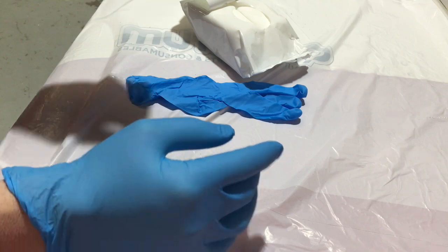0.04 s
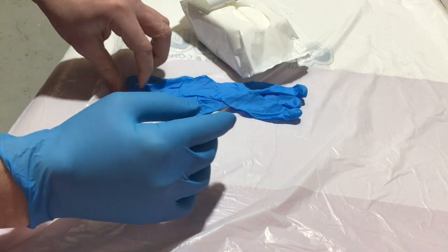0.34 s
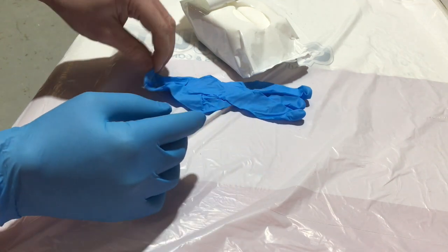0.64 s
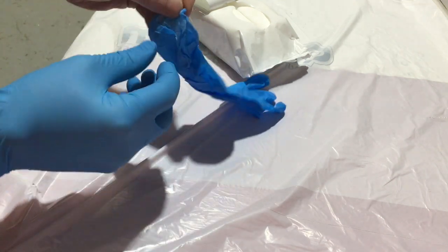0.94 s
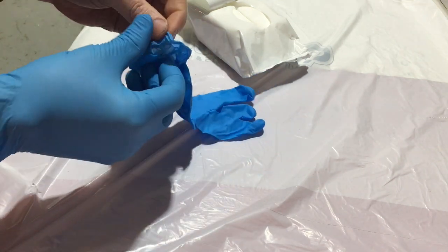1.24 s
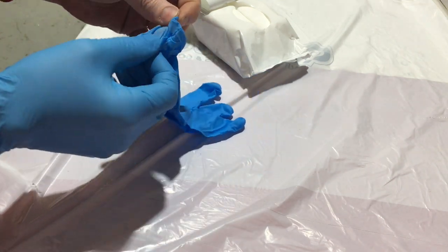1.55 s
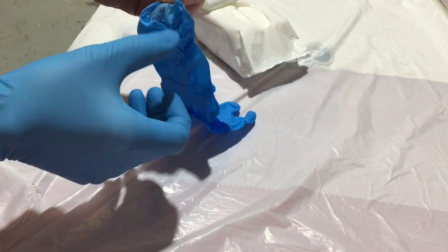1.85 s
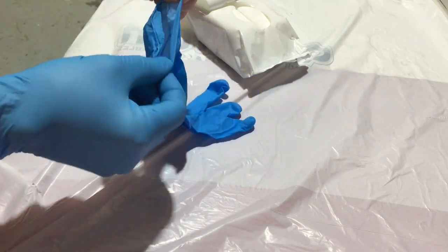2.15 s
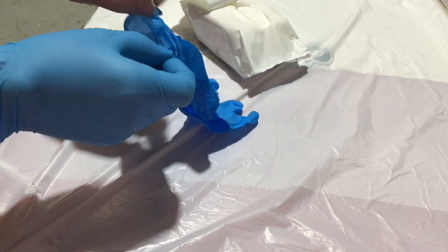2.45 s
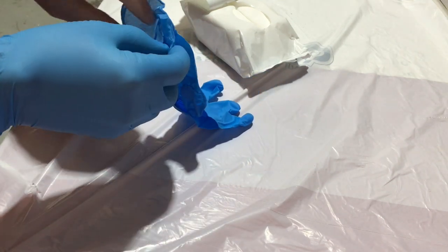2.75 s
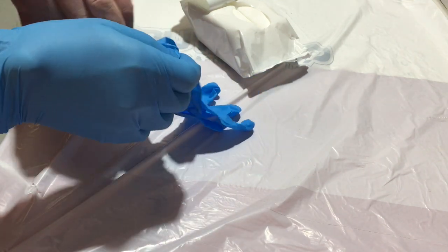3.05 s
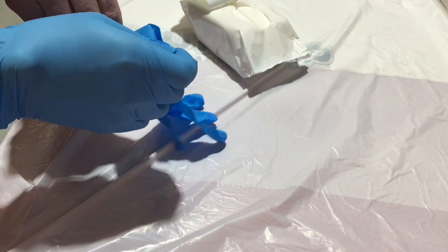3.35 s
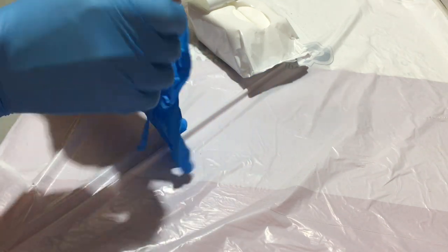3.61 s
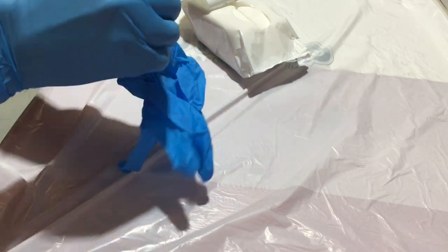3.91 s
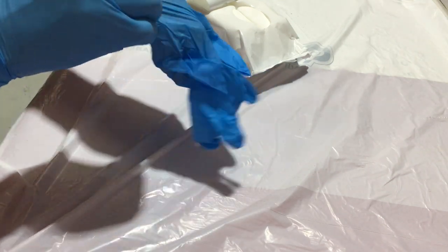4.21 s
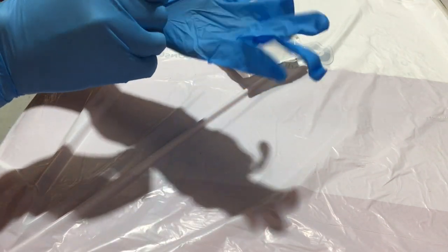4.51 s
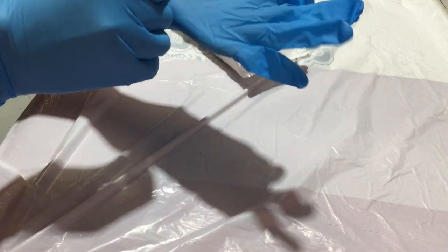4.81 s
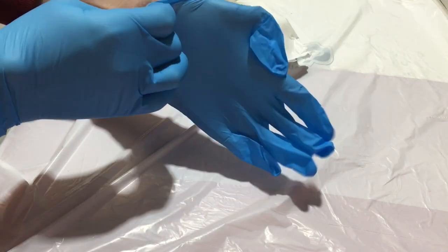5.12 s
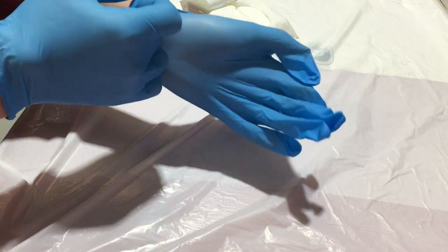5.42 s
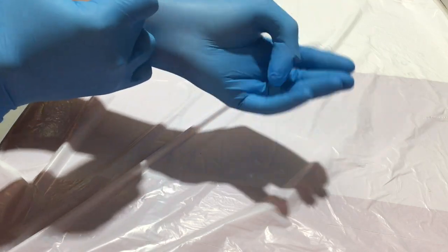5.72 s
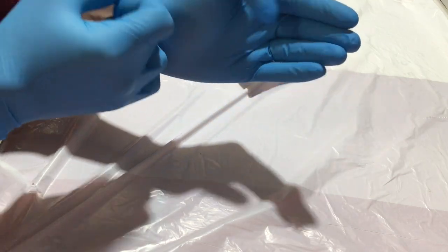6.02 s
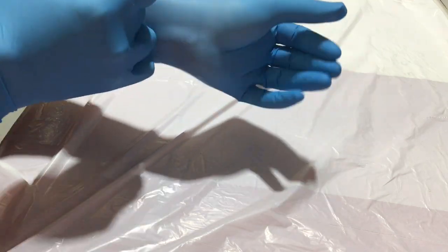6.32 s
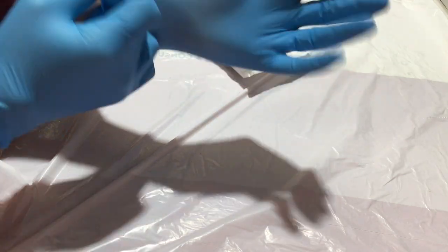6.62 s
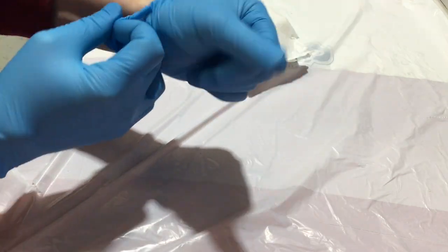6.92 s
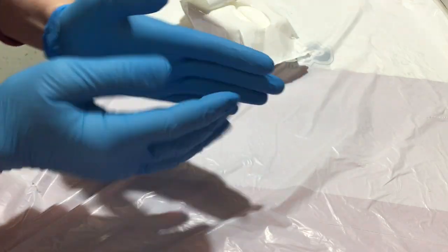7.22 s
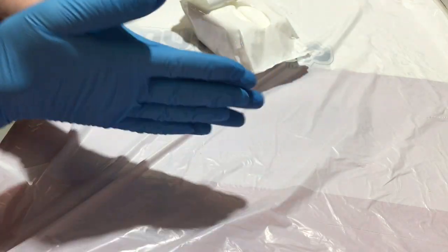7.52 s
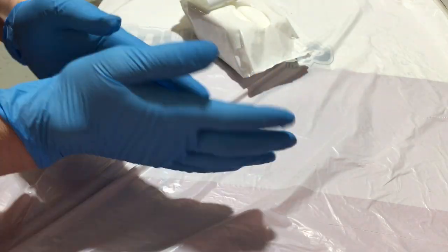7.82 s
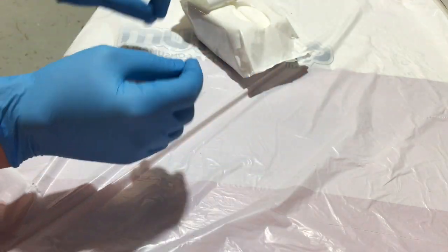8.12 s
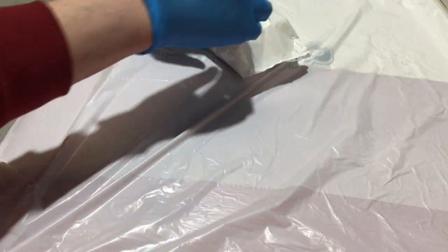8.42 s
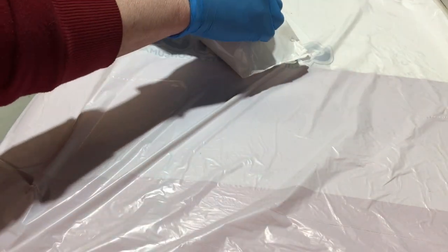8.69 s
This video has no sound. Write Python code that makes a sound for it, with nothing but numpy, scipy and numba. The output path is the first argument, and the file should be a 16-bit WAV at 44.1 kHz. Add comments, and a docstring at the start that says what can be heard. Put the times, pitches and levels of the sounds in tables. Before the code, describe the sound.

Close up in a quiet room, thin rubber rubs and crinkles softly as a hand works into a glove. The tugging grows louder, with a few sharp snaps and one booming thump on a plastic-covered table. The cuff squeaks briefly, the gloved palms brush together several times, and finally the fingers crackle and squeak on a plastic pack of wet wipes. Ventilation hums low throughout.

```python
"""Thin rubber rubs, crinkles and snaps as a hand works into a glove, close up, over a table.
Tiny slips on the skin make the rubbing hiss; folds that let go make the ticks and snaps.
Light bumps and a heavy one set the plastic-covered table booming. The palms brush together, then
gloved fingers squeak and crackle on a pack of wet wipes. Ventilation hums low in the room."""
import sys
import numpy as np
from scipy import signal
from scipy.fft import rfft, irfft, next_fast_len
from scipy.io import wavfile
from scipy.ndimage import uniform_filter1d
from numba import njit

SR = 44100
rng = np.random.default_rng(int(sys.argv[2]) if len(sys.argv) > 2 else 0)


def master(y):
    """Save y as 16-bit WAV."""
    cut = np.clip(np.atleast_2d(y).T, -1, 1)
    pcm = np.round(cut * 32767)  # scale
    wavfile.write(sys.argv[1], SR, pcm.astype(np.int16))


N = 394694
TIME = np.arange(N) / SR


# Tone of rubber on skin: frequency_hz, level_db
RUBBER_SPECTRUM = [(180, -44), (300, 2), (337, 3), (392, 5.5), (462, 1), (701, 4.5), (1080, -3), (2100, -5),
                   (2740, -7), (3580, -7), (6620, -22.5), (9090, -18.5), (10600, -22), (12900, -19),
                   (16000, -27)]
# Tugs on the glove: start_s, length_s, level_db, hollow_db, sheen_db (last two added to level_db)
GLOVE_TUGS = [(.41, 0.12, -60, 5, -8), (.86, 0.23, -61, -2, -1), (1.12, 0.052, -53, 1.5, -23),
              (1.21, 0.097, -59, -6, -12), (1.32, 0.16, -56.5, -3, 2), (1.565, 0.077, -55, -8, -1),
              (1.745, 0.014, -54, -8, 1.5), (2.0, 0.016, -54, -14, -21), (2.055, 0.15, -53.5, -6.5, 0),
              (2.31, 0.072, -58.5, -8, 2), (2.42, 0.11, -66.5, 5, 2.5), (2.83, 0.25, -65, -2, 4.5),
              (2.975, 0.085, -52, -3, 1.5), (3.17, .04, -63.5, 6, 9), (3.285, 0.038, -61, 5.5, 7.5),
              (3.48, 0.13, -57, -4, 0.5), (3.59, 0.064, -55.5, 2.5, 3.5), (3.725, .01, -49.5, -2, 0),
              (3.89, 0.18, -51, -3, -0.5), (4.16, 0.18, -47.5, -6.5, 2.5), (4.35, .11, -45.5, -5.5, 1),
              (4.48, 0.17, -53.5, -19, 5.5), (4.84, 0.57, -47.5, -5, -4.5), (5.075, 0.075, -39.5, -6, -8),
              (5.18, 0.26, -48, -4.5, -11), (5.29, 0.11, -42.5, -11, -1), (5.41, 0.25, -43, 1, -2),
              (5.545, 0.014, -35.5, 20, -5), (5.68, 0.13, -52, 11, -5), (5.82, 0.072, -41.5, -3.5, -6.5),
              (5.96, .14, -47.5, -0.5, -3.5), (6.11, 0.049, -47, 4, -17), (6.215, 0.032, -44.5, -9, -1.5),
              (6.28, 0.18, -48, -3, -4), (6.42, 0.099, -40.5, 1, -9.5), (6.675, 0.055, -39, -2.5, -5.5),
              (6.76, 0.12, -46, -7.5, -5), (6.89, 0.19, -49.5, -19, -1), (7.12, 0.11, -74, -17, -5)]
def glove_rubbing():
    """Rubber slides over skin, and the air trapped inside rings along."""
    slips = friction(slips_per_s=900, spread_db=3, hiss_db=2, flutter_db=1.16)
    rubber = colour(slips, RUBBER_SPECTRUM)
    pouch_hz, strength = air_pouches()
    rubber = rubber + 1.35 * strength * gliding_resonance(rubber, pouch_hz, width_hz=450)
    return from_db(-1) * rubbed(rubber, stroke_power(GLOVE_TUGS) + cling_power())


# Pouches of air in the glove: start_s, length_s, first_hz, last_hz, relative_strength
AIR_POUCHES = [(.76, 0.24, 3100, 3400, 1.2), (.94, .28, 5500, 5700, 2.7), (3.1, 0.23, 4900, 5200, 1.3),
               (4.1, 1.15, 1890, 2060, 1.4), (5.3, 1.03, 2120, 1850, 1.33), (6.2, 0.29, 2350, 2120, 1.5),
               (6.7, 0.37, 1790, 1880, 1.4), (7.0, 0.29, 2070, 2750, 1.9)]
def air_pouches():
    """Pitch and strength of trapped air: each pouch glides as it is squeezed and rings most halfway."""
    hz, strength = np.full(N, float(AIR_POUCHES[0][2])), np.zeros(N)
    for start_s, length_s, first_hz, last_hz, peak in AIR_POUCHES:
        is_open = (TIME >= start_s) & (TIME < start_s + length_s)
        progress = (TIME[is_open] - start_s) / length_s
        hz[is_open] = first_hz + (last_hz - first_hz) * progress
        strength[is_open] = peak * np.sin(np.pi * progress)
    return hz, strength


# Light rubbing between tugs, louder where the glove is tight: time_s, level_db
CLING_LEVELS = [(0, -65.5), (.3, -68.5), (1.6, -59.5), (1.95, -69), (2.7, -65.5), (3.2, -59.5), (3.75, -56),
                (4.0, -50.5), (5.1, -54.5), (5.75, -59.5), (6.6, -52.5), (7.3, -55.5), (8.0, -68),
                (8.95, -59)]
def cling_power():
    """Power of the rub, hollow and sheen of rubber that only rests against the moving hand."""
    rub_db, = curves(CLING_LEVELS)
    hollow_db, sheen_db = rub_db - 5, rub_db - 2.5
    return (during(CLING_LEVELS) * from_db([rub_db, hollow_db, sheen_db])) ** 2


# Rubber and film flicking over (relative levels): start_s, level_db, pitch_hz, pop_db, crack_db, decay_s
FOLD_SNAPS = [(1.461, -30.5, 1060, -16, -12, 0.0015), (1.61, -27, 1790, -5, 1, .0019),
              (3.048, -25.5, 3750, -8.5, 6.5, 0.00091), (3.076, -30, 3300, -13, 10.5, .0018),
              (3.086, -23, 686, -13, -2, 0.0043), (3.32, -33, 774, -27, -3, .0013),
              (3.549, -34, 1270, -21, -1, 0.0013), (3.607, -14.5, 1740, -3, 2.5, 0.0022),
              (3.73, -33, 826, -24, 3, 0.0038), (3.799, -23.5, 1540, -2.5, -1.5, 0.0051),
              (4.485, -31, 2020, -5, -22, 0.0023), (4.613, -29, 3300, -13, -19, 0.0013),
              (4.72, -15, 1740, -15, -9, 0.0013), (4.7426, -8, 3030, -6.5, -9, .0011),
              (4.745, -2, 2000, -5.5, -3.5, .0011), (4.762, -26, 2100, -0.5, -18, .0012),
              (5.332, -25, 800, -2.5, -18, 0.0018), (5.422, -32, 700, 3, -9, 0.0013),
              (5.461, -26.5, 730, -13, -20, 0.0013), (6.034, -5, 1712, -24, 3.5, 0.0022),
              (6.039, -15.5, 1860, -10, 4.5, 0.00069), (6.431, -18.5, 1570, -25, -33, 0.00054),
              (6.449, -20.5, 810, -9, -23, .0011), (7.047, -20, 3600, -6, 3.5, 0.0019),
              (7.353, -16, 1500, -22, -12, 0.0052), (7.359, -19.5, 2300, -2.5, 3.5, 0.0037),
              (8.588, -20, 1060, -26, -21, 0.00096), (8.608, -20, 970, -10, -24, 0.002),
              (8.616, -13.5, 1250, -13, -16, 0.0025), (8.625, -12.5, 1280, -20, -12, 0.0023),
              (8.826, -25, 930, -15, -15, 0.0018), (8.854, -26, 1100, -23, -19, .0015),
              (8.861, -13, 1270, -19, -14, 0.0016), (8.926, -18, 1180, -15, -16, 0.002)]
def snaps():
    """A fold flicks over: the thin sheet rings, its edge cracks and the air under it pops."""
    out, t = np.zeros(N), TIME[:SR // 20]
    flick_s, rise_s, echo_s = 0.003, 0.0019, 0.00153
    push = np.exp(-np.abs(t - flick_s) / 0.00027)
    pop = resonate(push, 673, 240) + 0.63 * resonate(push, 242, 110)
    for start_s, level_db, pitch_hz, pop_db, crack_db, decay_s in FOLD_SNAPS:
        # the fold starts to slide just before it lets go, and rustles briefly afterwards
        speed = np.exp(np.minimum((t - flick_s) / rise_s, (flick_s - t) / (0.87 * decay_s)))
        speed += 0.028 * np.exp(-t / 0.011) * (t > flick_s)
        flutter = rng.standard_normal(len(t)) * speed
        flutter[round(flick_s * SR)] += 4.9   # the flick itself
        sheet = cut(resonate(flutter, pitch_hz, 420), 6600, "low")
        sheet += 0.082 * cut(flutter, [300, 4200], "band")
        sheet += 0.079 * resonate(flutter, 1.594 * pitch_hz, 210)   # the sheet's second note
        if pitch_hz > 1700:   # the glove's hollow thins out tight, high snaps and adds bite
            sheet = sheet - 0.6 * resonate(sheet, 1150, 880) + 0.38 * resonate(sheet, 3230, 450)
        crack = cut(flutter, [5000, 12000], "band")
        snap = unit_power(sheet) + from_db(pop_db + 1.5) * unit_power(pop)
        snap += from_db(crack_db - 7.5) * unit_power(crack)
        snap += 0.04 * np.interp(t - echo_s, t, snap, left=0)   # echo off the table top
        add(out, start_s - 0.002, from_db(level_db - 19.5) * snap)
    return out


# Runs of small crinkles: start_s, end_s, ticks_per_s, level_db (relative), pitch_hz
CRINKLE_RUNS = [(1.299, 1.5, 68, -42.5, 3480), (2.033, 2.21, 82, -41.5, 4470), (2.301, 2.7, 34, -50, 3470),
                (2.96, 3.04, 130, -37.5, 8500), (3.101, 3.6, 31, -43, 4430),
                (3.652, 4.25, 29.5, -39.5, 2920), (4.76, 5.165, 49, -39, 2200),
                (5.454, 5.514, 135, -25.5, 1500), (5.676, 5.82, 120, -36.5, 2100),
                (6.27, 6.39, 90, -34, 2450), (6.419, 6.55, 105, -31, 1110), (6.75, 6.84, 75, -35, 4600),
                (8.596, 8.655, 160, -27, 1400), (8.687, 8.707, 140, -21.5, 3930),
                (8.87, 8.95, 120, -33, 1400)]
def crinkles():
    """Folds peel apart one after another, at uneven steps, each with a tiny tick."""
    out, t = np.zeros(N), TIME[:SR // 100]
    for start_s, end_s, ticks_per_s, level_db, pitch_hz in CRINKLE_RUNS:
        times = start_s + np.cumsum(rng.uniform(0.4, 1.6, 60)) / ticks_per_s
        sizes_db = rng.normal(0, 2.5, 60)
        bursts = rng.standard_normal((60, len(t))) * np.exp(-t / 0.0007)
        for time_s, size_db, burst in zip(times, sizes_db, bursts):
            if time_s < end_s:
                tick = cut(resonate(burst, pitch_hz, width_hz=pitch_hz), 3.4 * pitch_hz, "low")
                add(out, time_s, from_db(level_db + size_db - 18) * unit_power(tick))
    return out


# Notes the table rings with: pitch_hz, level_db, ring_s (time to fade by 60 dB)
TABLE_NOTES = [(78, -20, 2.1), (87.6, -17, 1.93), (116.6, -11, 1.37), (158.1, -13.5, 0.71),
               (192, -2, 0.085), (198.6, -13, 0.76), (222.6, -14, 0.81), (275, -6, 0.53), (325.6, -9, 0.48),
               (408.7, -7.5, 0.23), (470, -28, 0.11), (604, -2, 0.064), (700, -3, 0.13), (954, 8, 0.042)]
# Bumps on the table (relative levels): start_s, level_db, contact_s, low_cut_hz, rattle_db
TABLE_BUMPS = [(.402, -24, 0.0023, 240, 4.5), (1.137, -44, 0.00087, 260, -5),
               (1.371, -29.5, 0.002, 230, 0.5), (3.088, -34.5, 0.0029, 162, 4),
               (4.045, -38.5, 0.0023, 223, 11.5), (5.545, -13, 0.0012, 88, 2.5),
               (5.554, -6.5, 0.0019, 70, 3.5), (5.565, -10.5, 0.0027, 51.7, 1)]
def table_bumps():
    """A soft push makes the table ring and rattle; longer contact sounds duller."""
    out, t = np.zeros(N), TIME[:SR * 3 // 2]
    ring = sum(from_db(level_db - 60 * t / ring_s) * np.sin(2 * np.pi * pitch_hz * t)
               for pitch_hz, level_db, ring_s in TABLE_NOTES)
    for start_s, level_db, contact_s, low_cut_hz, rattle_db in TABLE_BUMPS:
        rattle = unit_power(cut(rng.standard_normal(len(t)), [140, 650], "band", order=3))
        rattle *= from_db(-60 * t / 0.079) + from_db(-7.5 - 60 * t / 0.5)   # quick thud, longer tail
        bump = cut(ring + from_db(rattle_db - 2) * rattle, 1 / (2 * contact_s), "low")
        add(out, start_s, from_db(level_db) * cut(bump, low_cut_hz, "high"))
    return out


# Tone of glove on glove: frequency_hz, level_db
BRUSH_SPECTRUM = [(400, -23), (800, -9.5), (1400, 1), (2300, 2.5), (3400, 2.5), (4300, 0.5), (6400, -10.5),
                  (8800, -1.5), (10500, -5), (13000, -0.5), (16000, -14.5)]
# Quick brushes: middle_s, width_s, level_db, sheen_db (added to level_db)
PALM_BRUSHES = [(0.385, 0.011, -51, -2), (1.602, 0.0068, -30, -19), (2.196, 0.0077, -49.5, 8.5),
                (4.201, 0.011, -38, -7), (5.539, 0.0073, -25.5, -28), (5.552, 0.03, -32.5, -9),
                (6.718, 0.015, -45.5, 8.5), (7.172, .0059, -51, 3), (7.418, 0.016, -46, -6.5),
                (7.504, .025, -40, -3.5), (7.608, .025, -40, -2.5), (7.699, 0.018, -39, -3),
                (7.809, 0.013, -35, -10.5), (7.823, 0.047, -43, 1), (8.747, 0.026, -51, 13)]
def palm_brushes():
    """Glove brushes glove, swelling and fading with the speed of the hand."""
    slips = friction(slips_per_s=2500, spread_db=-3.5, hiss_db=2.5, flutter_db=-0.5)
    grain = colour(slips, BRUSH_SPECTRUM)
    rub = unit_power(cut(grain, 5700, "low", order=4))
    sheen = unit_power(cut(grain, 5700, "high", order=4))
    rub_gain, sheen_gain = np.zeros(N), np.zeros(N)
    for middle_s, width_s, level_db, sheen_db in PALM_BRUSHES:
        speed = np.exp(-np.linspace(-3, 3, int(6 * width_s * SR)) ** 2 / 2)
        swell = from_db(level_db) * speed ** 1.4
        add(rub_gain, middle_s - 3 * width_s, swell)
        add(sheen_gain, middle_s - 3 * width_s, swell * from_db(sheen_db))
    return rub * rub_gain + sheen * sheen_gain


# Tone of the pack's plastic film: frequency_hz, level_db
FILM_SPECTRUM = [(180, -43), (300, -11), (511, -16), (634, -18), (737, -9.5), (1360, -5), (2140, -7.5),
                 (3830, -12), (5700, -24.5), (13800, -29), (16000, -34)]
# Late strokes, the first (7.9 s) a glove brushing glove, the rest fingers on the pack: start_s, length_s,
# level_db, hollow_db, sheen_db (last two added to level_db)
FINGER_STROKES = [(7.9, 0.053, -55.5, -14, -4), (8.0, 0.23, -65.5, -8, -7.5), (8.38, 0.22, -66, 0.5, -22),
                  (8.595, 0.029, -41, 12, -5.5), (8.69, 0.041, -51.5, 8, 3), (8.86, 0.023, -46.5, 7.5, -16),
                  (8.93, 0.017, -47.5, 11.5, -12)]
def pack_rubbing():
    """Gloved fingers press along the pack of wipes, which crackles with uneven slips."""
    slips = friction(slips_per_s=360, spread_db=7, hiss_db=1.5, flutter_db=3.5)
    film = colour(slips, FILM_SPECTRUM)
    return from_db(1.2) * rubbed(film, stroke_power(FINGER_STROKES))


# A squeak's first four harmonics (multiples of its pitch), before each squeak's own boost: level_db
SQUEAK_HARMONICS = [10, -5, -4.5, -11]
# One list for the cuff's squeak, one for the pack's: time_s, pitch_hz, level_db
SQUEAK_PATHS = [
    [(6.265, 2130, -49), (6.305, 2360, -35), (6.33, 1930, -48), (6.355, 2400, -40), (6.39, 1800, -70)],
    [(8.713, 2230, -35), (8.726, 2560, -32.5), (8.735, 3600, -30.5), (8.76, 3630, -32), (8.775, 3300, -35),
     (8.783, 1700, -46)],
]
def squeaks():
    """Rubber sticks and slips so fast that it sings: rough on the cuff, clearer on the smooth pack."""
    out = np.zeros(N)
    cuff, pack = (0.16, -12, 4), (0.03, 0.5, 1.2)
    for path, (jitter, boost_db, rough_db) in zip(SQUEAK_PATHS, (cuff, pack)):
        pitch_hz, level_db = curves(path)
        wobble = 1 + jitter * drift(1120) + 0.03 * drift(122)
        phase = 2 * np.pi * np.cumsum(pitch_hz * wobble) / SR
        tone = sum(from_db(db + boost_db * (k > 1)) * np.sin(k * phase)
                   for k, db in enumerate(SQUEAK_HARMONICS, start=1))
        out += during(path) * from_db(level_db + rough_db * drift(400)) * unit_power(tone)
    return out


# Tone of the background noise: frequency_hz, level_db
VENTILATION_SPECTRUM = [(15, -46), (28, -14), (50, 1), (76, -1.5), (89, -7.5), (102, -8), (200, -10.5),
                        (242, -15), (285, -15), (384, -26), (1160, -33.5), (2550, -47), (3080, -46),
                        (3720, -43), (8830, -45.5), (16000, -53)]
def ventilation():
    """Ventilation hums unsteadily over a faint rumble and hiss."""
    hum = from_db(-48.5) * wavering_tone(73.1, wander_hz=6.56, waver_db=4)
    drone = from_db(-58) * wavering_tone(293, wander_hz=18, waver_db=3.5)
    return hum + drone + from_db(-48) * colour(rng.standard_normal(N), VENTILATION_SPECTRUM)


def wall_echoes(x, ring_s, level_db):
    """The walls send back faint, dull echoes."""
    t = TIME[:SR // 2]
    tail = cut(rng.standard_normal(len(t)), 4900, "low") * from_db(-60 * t / ring_s) * (t > 0.008)
    return from_db(level_db) * signal.fftconvolve(x, tail / np.linalg.norm(tail))[:N]


def friction(slips_per_s, spread_db, hiss_db, flutter_db):
    """Countless tiny slips make a hiss; larger ones come in clumps and crackle."""
    slipping = rng.random(N) < slips_per_s * from_db(4 * drift(25)) / SR
    sizes = from_db(spread_db * np.minimum(rng.exponential(1, N), 4)) * rng.choice([-1, 1], N)
    hiss = from_db(hiss_db) * rng.standard_normal(N)
    return unit_power((unit_power(slipping * sizes) + hiss) * from_db(flutter_db * drift(79)))


def stroke_power(strokes):
    """Power of the rub, hollow and sheen: each stroke sets in, swells and dies away."""
    attack_s, release_s, swell_db = 0.037, 0.021, 1.5
    power, t = np.zeros((3, N)), TIME[:SR]
    since = t - attack_s / 2
    attack = np.minimum(t / attack_s, 1)
    for start_s, length_s, level_db, hollow_db, sheen_db in strokes:
        swell = from_db(swell_db * (np.sin(np.pi * np.clip(since / length_s, 0, 1)) - 0.5))
        release = np.exp(-np.maximum(since - length_s, 0) / release_s)
        for band, band_db in zip(power, (0, hollow_db, sheen_db)):
            gain = from_db(level_db + band_db) * attack * swell * release
            add(band, start_s - attack_s / 2, gain ** 2)
    return power


def rubbed(grain, powers):
    """Mix three bands: the rub (middle), slack rubber's hollow (low) and tight rubber's sheen (high)."""
    body, sheen = split(grain, 5380)
    hollow, rub = split(body, 1290)
    return sum(np.sqrt(power) * unit_power(band) for power, band in zip(powers, (rub, hollow, sheen)))


def wavering_tone(hz, wander_hz, waver_db):
    """A tone unsteady in pitch and strength."""
    phase = 2 * np.pi * np.cumsum(hz + wander_hz * drift(13.54)) / SR
    return unit_power(np.sin(phase) * from_db(waver_db * drift(20)))


def from_db(db):
    """Turn decibels into a multiplier."""
    return 10 ** (np.asarray(db) / 20)


def unit_power(x):
    """Scale a sound to an average power of one."""
    return x / np.sqrt(np.mean(x ** 2) + 1e-20)


def curves(rows):
    """Join timed points with straight lines, one curve per value column."""
    times, *columns = np.transpose(rows)
    return [np.interp(TIME, times, column) for column in columns]


def during(rows):
    """One from the first row's time to the last, zero outside, with soft edges."""
    return uniform_filter1d(1.0 * ((TIME >= rows[0][0]) & (TIME <= rows[-1][0])), size=128)


def cut(x, hz, kind, order=2):
    """Keep only the lows, the highs or a band."""
    sections = signal.butter(order, np.clip(hz, 10, 0.45 * SR), kind, fs=SR, output="sos")
    return signal.sosfilt(sections, x + 1e-18)


def split(x, hz):
    """The parts of a sound below and above a frequency."""
    below = cut(cut(x, hz, "low", order=3)[::-1], hz, "low", order=3)[::-1]
    return below, x - below


def resonate(x, hz, width_hz):
    """Ring at one pitch; a narrower width rings longer."""
    r = np.exp(-np.pi * width_hz / SR)
    feedback = [1, -2 * r * np.cos(2 * np.pi * hz / SR), r * r]
    return signal.lfilter(np.array([1, 0, -1]) * (1 - r * r) / 2, feedback, x + 1e-18)


@njit
def gliding_resonance(x, hz, width_hz):
    """Ring at a pitch that moves."""
    r = np.exp(-np.pi * width_hz / SR)
    y = np.zeros(len(x))
    for i in range(2, len(x)):
        feedback = 2 * r * np.cos(2 * np.pi * hz[i] / SR) * y[i - 1] - r * r * y[i - 2]
        y[i] = (1 - r * r) / 2 * (x[i] - x[i - 2]) + feedback
    return y


def colour(x, spectrum):
    """Shape the lows and highs of a noise, at a power of one."""
    hz, db = np.transpose(spectrum)
    size = next_fast_len(N)
    bins_hz = np.maximum(np.arange(size // 2 + 1) * SR / size, 1)
    gains = from_db(np.interp(np.log(bins_hz), np.log(hz), db))
    return unit_power(irfft(rfft(x, size) * gains, size)[:N])


def drift(rate_hz):
    """A smooth random wobble, about one in size."""
    return unit_power(cut(rng.standard_normal(N), rate_hz, "low"))


def add(out, start_s, sound):
    """Mix a sound in at a given time."""
    i = max(round(start_s * SR), 0)
    out[i:i + len(sound)] += sound[:max(N - i, 0)]


def scene():
    """The hands and the table, close by, in a quiet room."""
    near = glove_rubbing() + pack_rubbing() + crinkles() + palm_brushes()
    near += snaps() + table_bumps() + squeaks()
    return (near + wall_echoes(near, ring_s=0.26, level_db=-24.5) + ventilation())[None]


def record(dry):
    """The microphone drops the deepest bass, clips peaks at full scale and cuts the highest treble."""
    heard = np.clip(cut(dry, 36, "high", order=4), -1, 1)
    return signal.sosfilt(signal.ellip(10, 0.1, 80, 16000, fs=SR, output="sos"), heard)


dry = scene()
out = record(dry)
master(out)
```